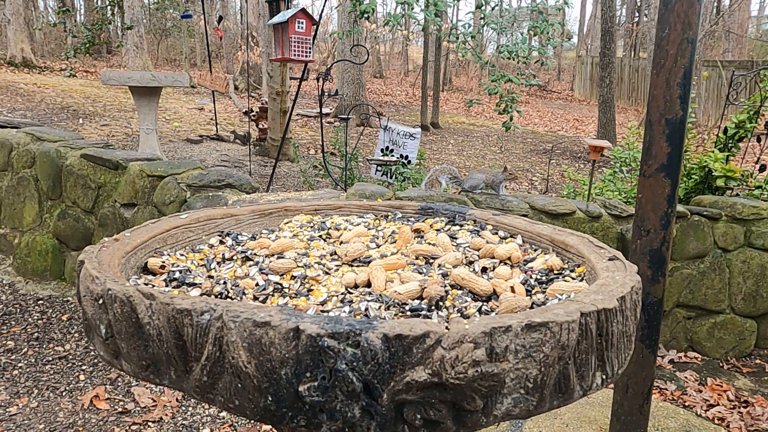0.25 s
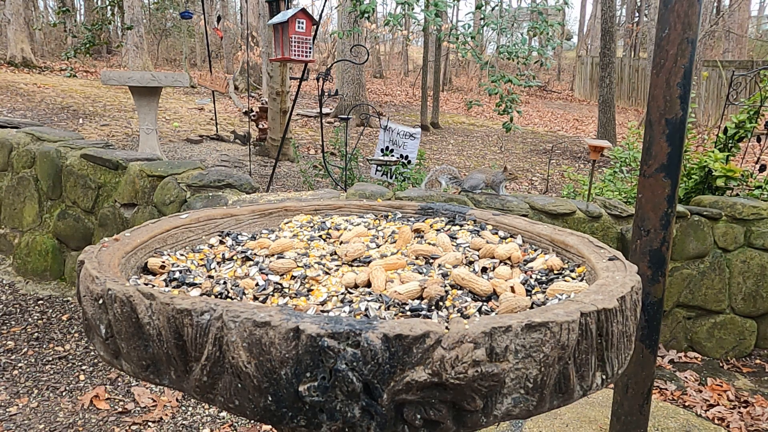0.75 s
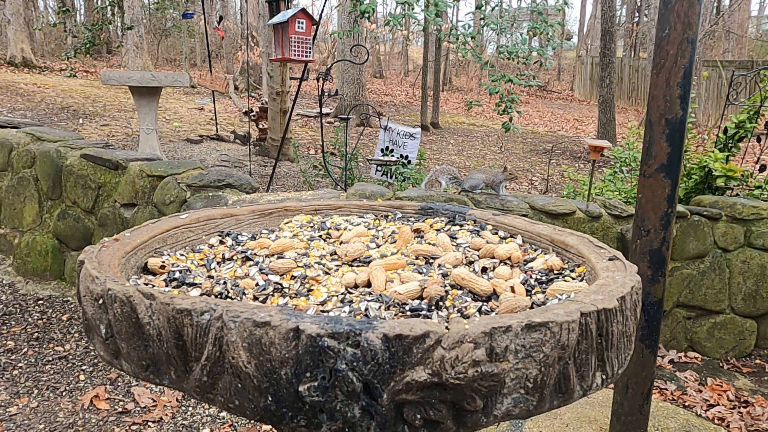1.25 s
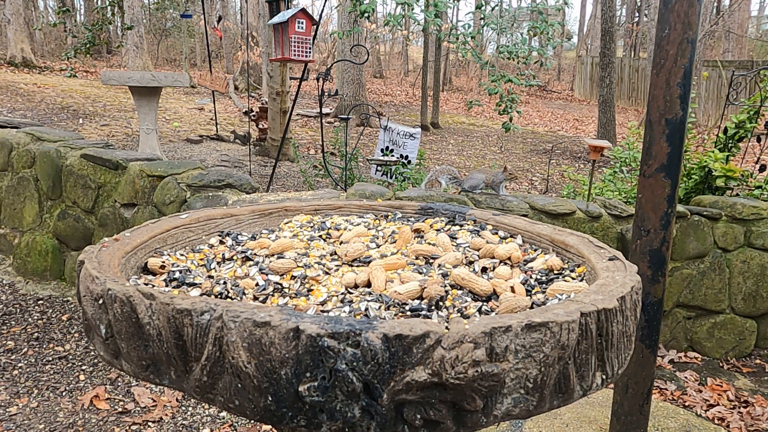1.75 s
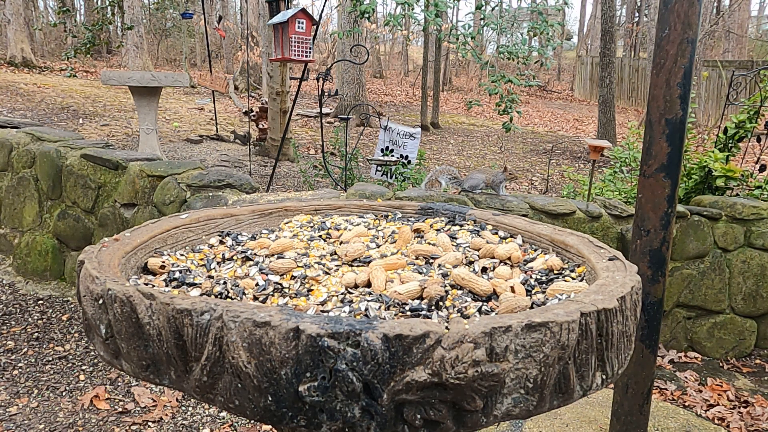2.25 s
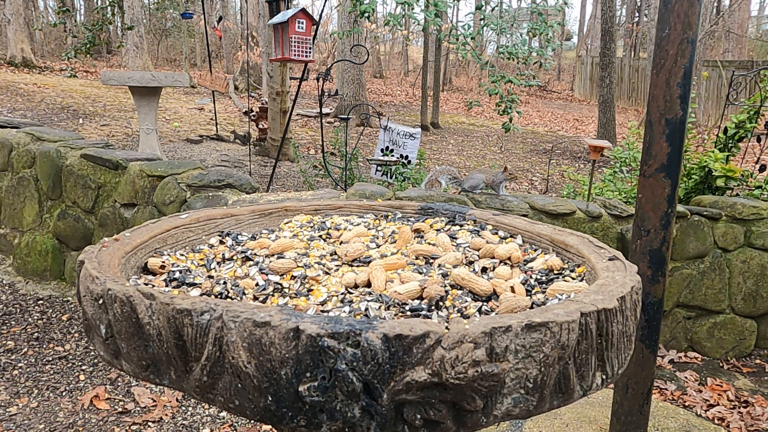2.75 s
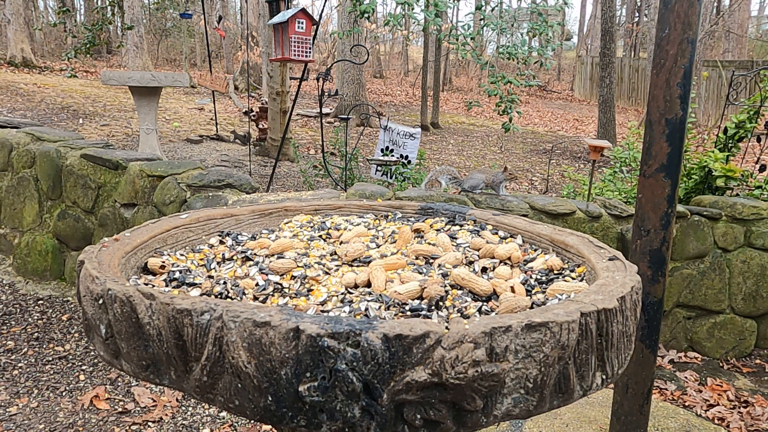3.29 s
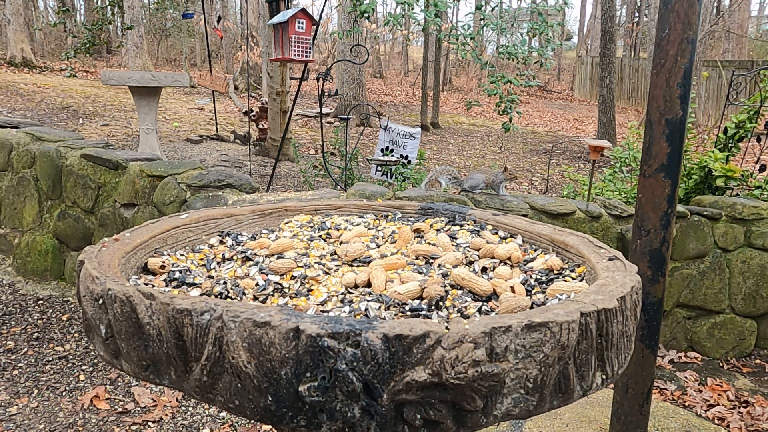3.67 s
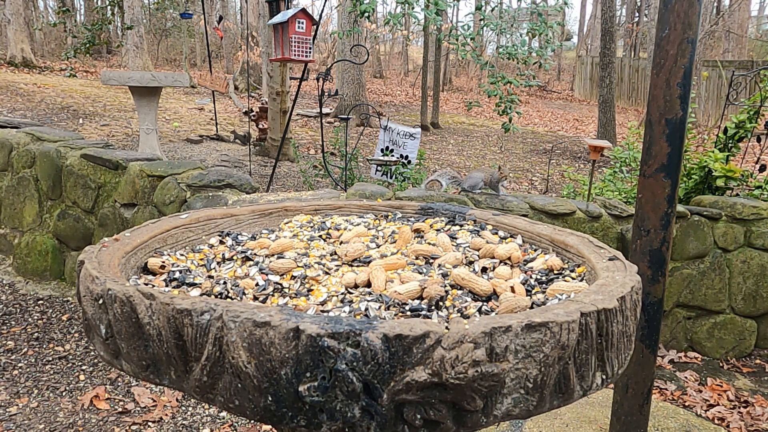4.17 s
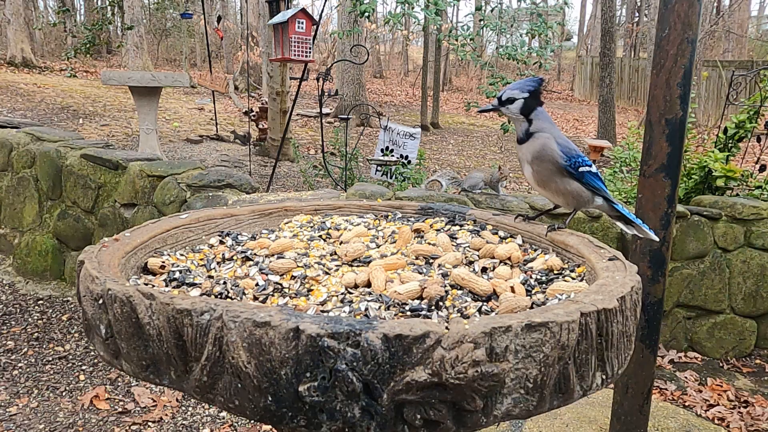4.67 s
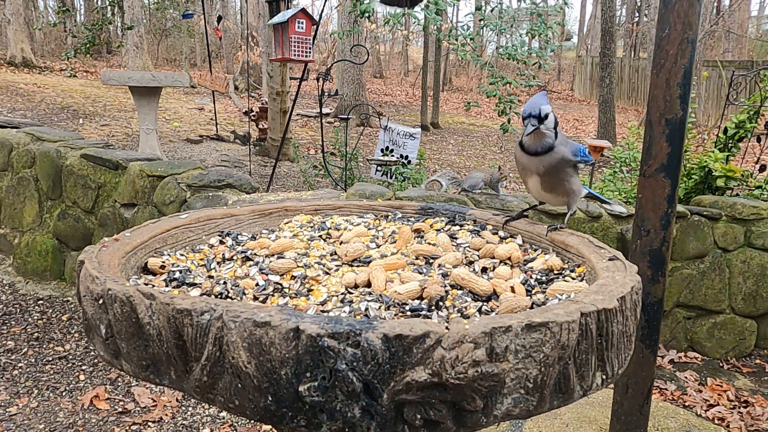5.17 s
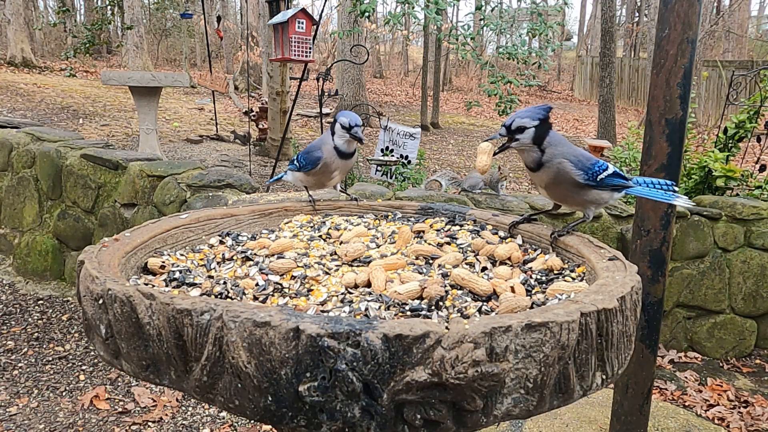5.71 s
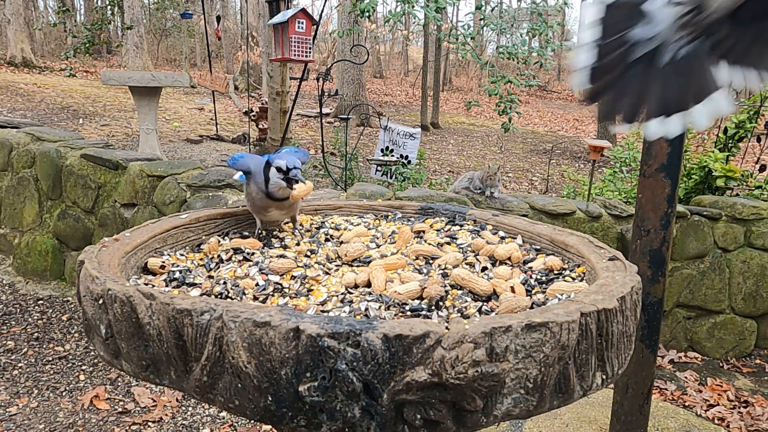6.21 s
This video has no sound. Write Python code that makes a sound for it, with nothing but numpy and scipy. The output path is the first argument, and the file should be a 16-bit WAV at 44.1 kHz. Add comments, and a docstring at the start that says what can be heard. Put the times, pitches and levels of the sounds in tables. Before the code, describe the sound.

Low distant road rumble under faint bird lisps, echoing blue jay jeers, a wing flurry and scratchy taps, then two piercing jay calls up close.

```python
"""Blue jays jeer in a wooded backyard: first from the trees, then two overlapping calls at a feeder close by.
Wings rustle, claws tap and small birds lisp over a low rumble of distant traffic.
The jeers are sums of partials from a two-sided syrinx, the lisps are gliding sines, the taps ring metal modes;
wings, knocks, leaves and road are shaped noise.
The close calls drive the recorder's limiter, which ducks the background and lets it back slowly."""
import sys
import numpy as np
from scipy import signal
from scipy.fft import rfft, irfft, next_fast_len
from scipy.io import wavfile
from scipy.ndimage import uniform_filter1d

SR = 44100
rng = np.random.default_rng(int(sys.argv[2]) if len(sys.argv) > 2 else 0)


def unload_audio(sound):
    """Save the sound as a 16-bit wav file, at the path given as the first command line argument."""
    columns = np.transpose(np.atleast_2d(sound))
    # keep every value between -1 and 1, then stretch to whole-number steps
    steps = np.round(np.clip(columns, -1, 1) * 32767)
    wavfile.write(sys.argv[1], SR, steps.astype(np.int16))


N = 284381
TIME = np.arange(N) / SR
EDGE_HZ = 15000  # top of the recorded band


def gain_of(db):
    """Decibels to amplitude."""
    return 10 ** (np.asarray(db) / 20)


def evened(x):
    """Scales to rms 1."""
    return x / np.sqrt(np.mean(abs(x) ** 2) + 1e-20)


def read(points, hz):
    """Reads a spectrum on a log-frequency axis."""
    f, value = np.transpose(points)
    return np.interp(np.log(hz + 1), np.log(f + 1), value)


def add(mix, s, sound):
    """Mixes a sound in at time s."""
    part = mix[..., max(round(s * SR), 0):][..., :sound.shape[-1]]
    part += sound[..., :part.shape[-1]]


def wander(size, hz):
    """Smooth random drift of rms about 1, mostly slower than hz."""
    padded = next_fast_len(size + SR // 4, True)
    f = np.fft.rfftfreq(padded, 1 / SR)
    spectrum = rfft(rng.standard_normal(padded)) / (1 + (f / hz) ** 4)
    return evened(irfft(spectrum, padded))[:size]


def noise(colour):
    """Stereo noise of rms about 1 with the given spectrum, nearly mono in the deepest bass."""
    # left-right likeness of diffuse sound: (frequency [Hz], likeness [0-1])
    likeness = [(30, 0.98), (120, 1), (250, 0.81), (500, 0.88), (1000, 0.78), (2000, 0.68), (8000, .7)]
    size = next_fast_len(N, True)
    hz = np.fft.rfftfreq(size, 1 / SR)
    a, b = rfft(rng.standard_normal((2, size)))
    same = np.clip(read(likeness, hz), 0, 1)
    mid, side = a * np.sqrt(1 + same), b * np.sqrt(1 - same)
    stereo = np.array([mid + side, mid - side]) * gain_of(read(colour, hz))
    return evened(irfft(stereo, size)[:, :N])


def band(x, lo_hz, hi_hz):
    """Gentle band-pass."""
    sos = signal.butter(2, [lo_hz, min(hi_hz, SR / 2 - 1)], "band", fs=SR, output="sos")
    return signal.sosfilt(sos, x)


def yard(x, wet_db, early_db, pan_db, lead_rad=0.62):
    """Direct sound, quick bounces off ground and wall, and a long scatter from the tree trunks."""
    # how long the trunks scatter: (frequency [Hz], t60 [s])
    scatter_t60 = [(200, 0.3), (1500, 1.3), (3500, 0.89), (7000, 0.71), (12000, 0.12)]
    t = np.arange(SR) / SR
    bounces = rng.standard_normal((3, SR)) * (rng.random((3, SR)) < 2500 / SR) * (t > .003)
    bounces = bounces[:2] + bounces[2]  # a shared part: the two microphones sit close together
    hz, frame_s, z = signal.stft(bounces, SR, nperseg=256)
    decay = gain_of(-60 * frame_s / read(scatter_t60, hz)[:, None])
    tail = signal.istft(z * decay, SR, nperseg=256)[1][:, :SR]
    early = bounces * np.exp(-t / 0.022)
    echo = gain_of(wet_db) * tail / np.linalg.norm(tail[0])
    echo = echo + gain_of(early_db) * early / np.linalg.norm(early[0])
    turn = np.exp(.5j * lead_rad * np.array([[-1], [1]]))  # the right microphone leads a little in phase
    direct = (turn * signal.hilbert(x, next_fast_len(N))[:N]).real
    out = direct + signal.fftconvolve(x[None], echo, axes=1)[:, :N]
    pan = gain_of([[pan_db / 2], [-pan_db / 2]])
    return out * pan / np.sqrt(1 + gain_of(wet_db) ** 2 + gain_of(early_db) ** 2)


def background():
    """Distant traffic as rumble and tyre noise, a wavering engine hum and faint leaves."""
    # spectrum of the road: (frequency [Hz], relative level [dB])
    traffic = [(12, -40), (20, -8.5), (44, 3), (123, -2.5), (168, -11.5), (234, -14), (276, -19),
               (393, -20), (594, -26), (917, -21), (1390, -23.5), (1970, -27.5), (2370, -39.5), (2580, -41),
               (2800, -42.5), (3640, -72.5), (6160, -120)]
    # spectrum of the leaves: (frequency [Hz], relative level [dB])
    leaves = [(1500, -6.5), (2500, 8.5), (4000, -6.5), (7500, -7.5), (9000, -20.5), (12000, -21),
              (15000, -41.5)]
    rumble_db, tyres_db, hum_db, leaves_db = -42.5, -53.5, -52, -70.5
    # the traffic draws a little nearer, then holds
    approach_s, rumble_growth_db, tyres_growth_db = 1.1, 3.5, 2.3
    away = np.exp(-TIME / approach_s)
    road = noise(traffic + [(4000, -86), (8000, -110)])
    low = signal.sosfiltfilt(signal.butter(2, 240, fs=SR, output="sos"), road)
    high = (road - low) / np.std(band(road, 300, 1400))  # the tyre level is that of this band
    rumble = evened(low) * gain_of(rumble_db - rumble_growth_db * away)
    tyres = high * gain_of(tyres_db - tyres_growth_db * away)
    hum_hz = 119.7 + 3 * wander(N, 7.07)
    hum = np.sin(2 * np.pi * np.cumsum(hum_hz) / SR) * (1 + 0.76 * wander(N, 1.3))
    return rumble + tyres + gain_of(hum_db) * evened(hum) + gain_of(leaves_db) * noise(leaves)


def small_birds(waver=0.04):
    """Thin whistles that glide and settle; the higher the start, the less steady."""
    # thin calls: (time [s], length [s], start pitch [Hz], end pitch [Hz], level [dB])
    lisps = [(0.139, 0.013, 5620, 7460, -55.5), (0.146, 0.022, 8000, 8700, -71),
             (0.167, 0.098, 7270, 7450, -80), (0.295, 0.065, 7100, 7600, -69.5),
             (0.775, 0.0088, 9000, 7340, -65), (1.165, .09, 7300, 7600, -73.5),
             (4.174, 0.09, 7300, 7370, -72), (4.623, 0.11, 2660, 2544, -62.5),
             (4.953, 0.12, 8600, 7400, -68.5)]
    glide_share = 0.31  # time constant of the glide, as a share of the whistle's length
    out = np.zeros(N)
    for s, length, start_hz, end_hz, db in lisps:
        size = int(length * SR)
        glide = end_hz + (start_hz - end_hz) * np.exp(-np.linspace(0, 1, size) / glide_share)
        hz = glide * (1 + waver * (start_hz / 8000) * wander(size, 300))
        whistle = np.sin(2 * np.pi * np.cumsum(hz) / SR) * signal.windows.tukey(size, .5)
        add(out, s, gain_of(db) * evened(whistle))
    return out


def flurry(start, length, db, growth_db):
    """Gain of one flurry: a quick attack, steady growth or fading, then a release."""
    attack_s, release_db_per_s = 0.0036, 130.5
    t = np.maximum(TIME - start, 0)
    growing_db = growth_db * np.maximum(1 - t / length, 0)
    level_db = db - growing_db - release_db_per_s * np.maximum(t - length, 0)
    return (1 - np.exp(-t / attack_s)) * gain_of(level_db)


def wings(beat_hz=17, beat_db=1.5, crackle_db=2.5):
    """Feathers hiss in uneven beats, and wings and breeze push puffs of air at the microphones."""
    # wing flurries: (start [s], length [s], final level [dB], growth on the way [dB])
    flurries = [(0.61, .04, -73, 2), (4.04, 0.023, -69, -5), (4.2, .23, -51.5, 17.5), (4.84, 0.49, -63, 3),
                (6.24, .2, -48, -0.5)]
    # puffs of air from wings and breeze: (middle [s], half width [s], level [dB])
    gusts = [(4.45, .04, -52), (4.79, 0.095, -38), (5.56, 0.23, -34), (6.38, 0.085, -31)]
    # spectrum of the feather hiss: (frequency [Hz], relative level [dB])
    feathers = [(200, -5), (1000, 6.5), (2500, -1), (4500, -4.5), (7500, -4.5), (9000, -11.5), (12000, -16),
                (15000, -27.5)]
    # spectrum of the moving air: (frequency [Hz], relative level [dB])
    draught = [(20, 6.5), (50, 15.5), (100, 11.5), (200, -16.5), (400, -30.5), (800, -53)]
    beats = np.sin(2 * np.pi * np.cumsum(beat_hz * (1 + 0.27 * wander(N, 9.1))) / SR)
    grain = evened(gain_of(beat_db * beats + crackle_db * wander(N, 350)))
    hiss = noise(feathers) * grain * sum(flurry(*row) for row in flurries)
    puffs = sum(gain_of(db) * np.exp(-((TIME - s) / width) ** 2) for s, width, db in gusts)
    return hiss + noise(draught) * puffs


def knocks(spread=1.3):
    """Dull knocks and wing thumps: well-damped noise around the pitch of the body struck."""
    # blows: (time [s], level at the strike [dB], pitch of the body [Hz])
    blows = [(0.752, -50, 714), (0.752, -49, 276), (0.827, -47, 800), (0.835, -44, 264), (1.171, -47, 740),
             (1.184, -40.5, 250), (2.007, -48, 472), (2.076, -43, 260), (2.135, -49, 684),
             (4.476, -47, 1110), (4.622, -45.5, 234), (6.266, -46, 1495), (6.35, -43, 260),
             (6.426, -43, 280)]
    t60 = .11  # s
    out, t = np.zeros(N), np.arange(SR // 5) / SR
    for s, db, hz in blows:
        body = band(rng.standard_normal(len(t)), hz / max(spread, 1.1), hz * spread)
        body = body * gain_of(-60 * t / t60)
        add(out, s, gain_of(db) * body / np.std(body[t < .008]))
    return out


def taps():
    """Short scratchy ticks of claws, bills and seeds; the feeder's metal rings with them, some far more."""
    # ticks: (time [s], level [dB], t60 of the tick [s], level of the metal ring against the tick [dB])
    ticks = [(0.828, -61, .05, -35), (1.231, -63.5, 0.24, -35), (3.598, -58, 0.23, -16),
             (3.752, -61.5, 0.18, -9), (3.787, -52.5, 0.25, -5), (4.382, -51, .05, -30),
             (4.413, -46.5, 0.034, -30), (4.478, -38.5, 0.043, -37), (4.58, -48.5, 0.023, -36),
             (4.859, -65.5, .05, -30), (4.909, -63, .02, -22), (6.253, -35.5, 0.051, -17),
             (6.266, -36, 0.039, -25)]
    # modes of the feeder fittings: (frequency [Hz], relative level [dB], t60 [s])
    metal = [(4680, -11, 0.48), (6570, -1.5, 0.25), (7600, -6, .2), (11800, -12, 0.18), (12200, -11, 0.18)]
    # spectrum of the scratch: (frequency [Hz], relative level [dB])
    scratch = [(300, -13), (1500, 7.5), (3000, 3.5), (7000, 1), (9000, -6), (12000, -6.5), (15000, -22)]
    out, grit, t = np.zeros(N), noise(scratch)[0], np.arange(SR // 3) / SR
    ring = sum(gain_of(db - 60 * t / t60) * np.sin(2 * np.pi * hz * t) for hz, db, t60 in metal)
    onset = 1 - np.exp(-t / 0.00081)
    for s, db, t60, ring_db in ticks:
        tick = np.roll(grit, -int(s * SR))[:len(t)] * gain_of(-60 * t / t60)
        add(out, s, gain_of(db) * (tick + gain_of(ring_db) * ring) * onset)
    return out


def breath(t, level_db, swell_db, fade_db, depth, rough, onset_rough, end_rough, low_entry_s):
    """Level, low-side depth and roughness through one jay call: it swells, holds, fades and gives out."""
    # breath pressure builds slowly and gives out quickly
    swell_s, release_s, release_db = 0.029, .008, 13.5
    # the voice is rough until it catches, and again as it gives out
    onset_rough_s, end_rough_s = .012, .026
    left = t[-1] - t
    db = level_db - swell_db * np.exp(-t / swell_s) - fade_db * (t / t[-1]) ** 3
    db = db - release_db * np.exp(-left / release_s)
    rough = rough + onset_rough * np.exp(-t / onset_rough_s) + end_rough * np.exp(-left / end_rough_s)
    low_entry = 1 - np.exp(-(t / low_entry_s) ** 2)  # the low side joins after the high side
    return db, depth * low_entry, rough


def jeer(hz, effort, throat, jitter, flutter, rasp_hz, end_rough, onset_rough=.5, low_entry_s=.045,
         slipped=0, end_note=0, opening_s=0.051, fading_db=2.5, bill_hz=4700, bill_width_hz=450,
         bill_db=12, treble_rasp=0.27):
    """The high side of the syrinx sings; the low side, locked at half its pitch or slipping, adds sidebands."""
    end_note_db, end_purity = 5.5, 0.95
    end_dull_db_per_khz = 3  # the end note loses its upper partials
    full_slip_hz, slip_rough, slip_depth = 156, 0.09, .3
    t = np.arange(len(hz)) / SR
    db, depth, rough = breath(t, *effort, onset_rough, end_rough, low_entry_s)
    db = db + end_note_db * end_note
    impure = 1 - end_purity * end_note
    depth = depth * impure + slip_depth * slipped
    rough = rough * impure + slip_rough * slipped
    slip_hz = full_slip_hz * slipped + np.zeros(len(t))
    low_hz = hz / 2 + slip_hz
    high = 2 * np.pi * np.cumsum(hz) / SR + jitter * rough * wander(len(t), rasp_hz)
    low = high / 2 + 2 * np.pi * np.cumsum(slip_hz) / SR
    shut = np.exp(-t / opening_s)  # the half-shut bill has a resonance that goes as it opens
    voice, power = np.zeros(len(t)), np.zeros(len(t))
    for side, strength in enumerate([1, depth, slipped * depth ** 2]):
        for k in range(side == 0, 10):
            partial_hz = k * hz + side * low_hz
            bill = bill_db * shut * np.exp(-((partial_hz - bill_hz) / bill_width_hz) ** 2)
            fading = fading_db * wander(len(t), 11)  # the head turns and each partial fades on its own
            dull = end_dull_db_per_khz * end_note * np.maximum(partial_hz - 2 * hz, 0) / 1000
            size = strength * gain_of(read(throat, partial_hz) + bill + fading - dull)
            size = size * (partial_hz < EDGE_HZ)
            # the top partials are always raspy
            rasp = flutter * rough + treble_rasp * (partial_hz / 10000) ** 3
            tremor = 1 + rasp * wander(len(t), rasp_hz)
            spread = (2 * k + side) ** 2  # the throat spreads each pulse out
            voice += size * tremor * np.cos(k * high + side * low + spread)
            power += size ** 2 * (1 + rasp ** 2) / 2
    edges = np.clip(np.minimum(t, t[-1] - t) / 0.0016, 0, 1)
    return gain_of(db) * edges * voice / np.sqrt(power)


def far_jays(name, throat, waver, **voice):
    """The calls of one voice in the trees: the pitch scoops up, wavers, sags, and may flip to an end note."""
    # calls: (voice, start [s], length [s], top pitch [Hz], sag of the pitch [0-1], end note [0-1], level [dB],
    #   swell at the start [dB], fade by the end [dB], depth of the low side [0-1], roughness [0-1])
    calls = [ ("distant", 1.313, .407, 1560, 0.0077, 0, -37.3, 3, 5, 0.84, 0.34),
             ("distant", 1.32, 0.173, 1635, 0.016, 0, -46, 1, 1, 0.35, 0.12),
             ("distant", 1.38, .22, 1485, 0.026, 0, -44, 6.5, 5.4, .22, 0.17),
             ("distant", 1.737, .44, 1564, .025, 0, -38.5, 4.1, 10.8, 0.78, 0.32),
             ("hoarse", 1.94, 0.22, 1714, 0.091, 0, -51, 6, 3, .11, 0.53),
             ("perched", 2.328, .232, 1815, .07, 1, -39, 12, 2, 0.78, 0.057),
             ("hoarse", 2.675, 0.07, 1830, .005, 0, -47.5, 1, 4, 0.14, .6),
             ("perched", 2.857, .254, 1848, .11, 0.58, -38, 11.5, 1.8, 0.83, 0.073)]
    # voice: share of its pitch by which a call starts flat [0-1]
    scoop = {"perched": 0.085, "distant": .015, "hoarse": 0.051}
    scoop_s, waver_hz = 0.01725, 14.5
    # a jeer may close on a short, pure, lower note
    end_note_s, end_flip_s, end_drop = .024, 0.0041, 0.087
    out = np.zeros(N)
    for who, start, length, top_hz, sag, end_note, *effort in calls:
        if who == name:
            t = np.arange(0, length, 1 / SR)
            flipped = end_note * (1 + np.tanh((t - length + end_note_s) / end_flip_s)) / 2
            flat = scoop[name] * np.exp(-t / scoop_s) + sag * (t / length) ** 2 + end_drop * flipped
            hz = top_hz * (1 - flat + waver * wander(len(t), waver_hz))
            add(out, start, jeer(hz, effort, throat, end_note=flipped, **voice))
    return out


def distant_jays():
    """Jeers from deep in the wood, with a strong low side and a slow, heavy flutter."""
    # throat and bill as heard from the wood: (frequency [Hz], relative level [dB])
    throat = [(800, -35), (1550, -18), (2330, -1), (3100, -0.5), (3900, -9.5), (4650, -11.5), (5200, -2),
              (5500, -0.5), (6200, -13.5), (7000, -21), (7800, -24), (9000, -32.5), (12500, -34.5),
              (14500, -68)]
    return far_jays("distant", throat, waver=.0065, onset_rough=.05, low_entry_s=.012, jitter=.5,
                    flutter=1.2, rasp_hz=200, end_rough=.2, opening_s=.14, fading_db=2.5,
                    bill_db=9, bill_width_hz=250)


def hoarse_jays():
    """Croaks with a weak low side, their pitch jittered by a rough voice."""
    # throat and bill of the hoarse voice: (frequency [Hz], relative level [dB])
    throat = [(900, -25), (1600, 17), (2000, -9), (2700, 17), (3700, -3), (5500, -22), (7500, -25),
              (11000, -51)]
    return far_jays("hoarse", throat, waver=.006, end_rough=.1, jitter=1.6, flutter=1, rasp_hz=170)


def perched_jays():
    """Steady jeers from the trees that flip down to a purer end note."""
    # throat and bill as heard from the trees: (frequency [Hz], relative level [dB])
    throat = [(900, -33), (1750, -16), (2700, -9), (3100, 0), (3650, -1.5), (4150, -11.5), (4600, -16),
              (5450, -10.5), (6300, -14), (7200, -11), (8100, -30.5), (9000, -26), (10000, -41),
              (14000, -58)]
    return far_jays("perched", throat, waver=0.0019, jitter=0.85, flutter=0.81, rasp_hz=260,
                    end_rough=0.13, fading_db=1.0)


def feeder_jay(pitch, effort, cracks, throat, slips=False, **voice):
    """One close jeer along its pitch curve, cracking here and there; the low side may slip free late on."""
    slip_at_s, slip_rise_s = 5.752, .016
    out, (s, hz) = np.zeros(N), np.transpose(pitch)
    t = np.arange(s[0], s[-1], 1 / SR)
    db, swell_db, fade_db, depth, rough = effort
    for at, width, more_rough, more_db in cracks:
        crack = np.exp(-((t - at) / width) ** 2)
        db, rough = db + more_db * crack, rough + more_rough * crack
    slipped = slips * (1 - np.exp(-np.maximum(t - slip_at_s, 0) / slip_rise_s))
    effort = (db, swell_db, fade_db, depth, rough)
    add(out, s[0], jeer(np.interp(t, s, hz), effort, throat, slipped=slipped, **voice))
    return out


def feeder_jays():
    """Two birds jeer at the feeder, the second breaking in on the first."""
    # effort, one row a jay: (level [dB], swell at the start [dB], fade by the end [dB],
    #   depth of the low side [0-1], roughness [0-1])
    efforts = [(-4, 12, 10.5, 0.49, 0), (-2, 7, 3, 0.48, .03)]
    # moments when a voice cracks, one list a jay: (time [s], half width [s], added roughness [0-1], added level [dB])
    cracks = [
        [(5.513, .006, .22, 2.5), (5.703, .006, .2, 7)],
        [(5.576, 0.0037, .28, 0)],
    ]
    # pitch curves: (time [s], pitch of the high side of the syrinx [Hz])
    first_pitch = [(5.309, 1373), (5.319, 1560), (5.335, 1796), (5.347, 1934), (5.377, 1975), (5.419, 1859),
                   (5.431, 1916), (5.505, 1869), (5.519, 1787), (5.531, 1785), (5.547, 1724), (5.611, 1719),
                   (5.681, 1608), (5.695, 1547), (5.71, 1268)]
    second_pitch = [(5.528, 1358), (5.536, 1571), (5.542, 1736), (5.558, 1955), (5.598, 2005),
                    (5.624, 1895), (5.694, 1736), (5.748, 1667), (5.8, 1581), (5.806, 1524), (5.812, 1433),
                    (5.825, 1200)]
    # throats and bills: (frequency [Hz], relative level [dB])
    first_throat = [(900, -33), (1400, -18), (1650, -23), (2000, -18.5), (2500, -5.5), (3200, -8),
                    (3750, 5), (4050, -2.5), (4700, -12.5), (5600, -15.5), (6700, -9.5), (7500, -10),
                    (8100, -22.5), (11500, -29.5), (14500, -50.5)]
    second_throat = [(900, -29), (1350, -14), (1600, -19), (1880, -27), (2000, -11.5), (2500, -8),
                     (2950, -11), (3400, 2), (3950, -0.5), (4300, -8), (4900, -12.5), (5500, -27),
                     (6000, -9), (6700, -10.5), (7500, -15), (8100, -25.5), (10500, -31.5), (14500, -49.5)]
    first = feeder_jay(first_pitch, efforts[0], cracks[0], first_throat, jitter=0.43, flutter=0.4,
                       rasp_hz=620, end_rough=.8, bill_db=11, treble_rasp=.17)
    second = feeder_jay(second_pitch, efforts[1], cracks[1], second_throat, slips=True, jitter=.65,
                        flutter=.9, rasp_hz=550, end_rough=.55, bill_db=8)
    return first + second


def scene():
    """Places each source in the yard; the jays in the trees echo far more than those at the feeder."""
    lisps = yard(small_birds(), wet_db=-3, early_db=-15.5, pan_db=3)
    contact = yard(taps() + knocks(), wet_db=-18.5, early_db=-12.5, pan_db=1)
    wood = yard(distant_jays(), wet_db=-1.5, early_db=2.0, pan_db=2.5)
    hoarse = yard(hoarse_jays(), wet_db=-9.5, early_db=-1, pan_db=1.0)
    tree = yard(perched_jays(), wet_db=-5, early_db=-5.5, pan_db=-0.5)
    near = yard(feeder_jays(), wet_db=-34.5, early_db=-15.5, pan_db=-1.0)
    return background() + lisps + wings() + contact + wood + hoarse + tree + near


def record(dry, ceiling_db=-7.5, recovery_db_per_s=7):
    """A peak limiter that clamps within milliseconds and recovers slowly; then the band limit."""
    peak_db = 20 * np.log10(abs(dry).max(0) + 1e-9)
    fall = TIME * recovery_db_per_s
    held_db = np.maximum.accumulate(peak_db + fall) - fall  # each peak is held, then sinks steadily
    over_db = np.maximum(held_db - ceiling_db, 0)
    limited = dry / gain_of(uniform_filter1d(over_db, size=150))
    low_pass = signal.firwin(511, EDGE_HZ, window=("kaiser", 9), fs=SR)
    return signal.oaconvolve(limited, low_pass[None], "same")


dry = scene()
out = record(dry)
unload_audio(out)
```